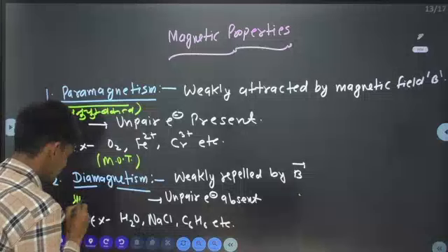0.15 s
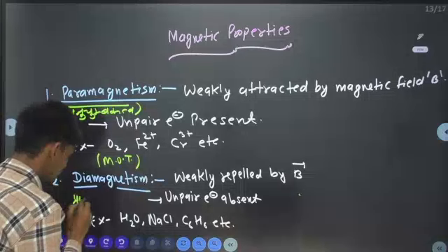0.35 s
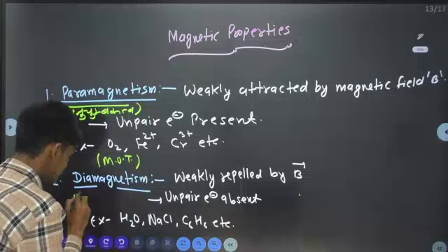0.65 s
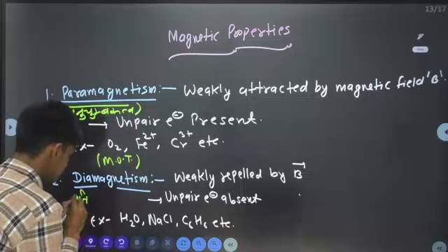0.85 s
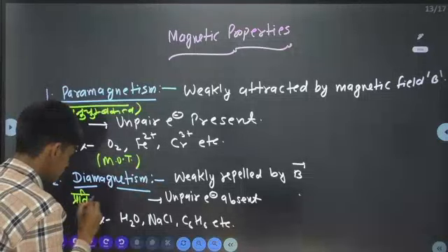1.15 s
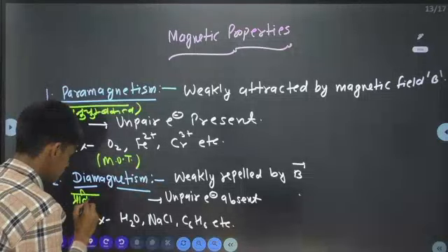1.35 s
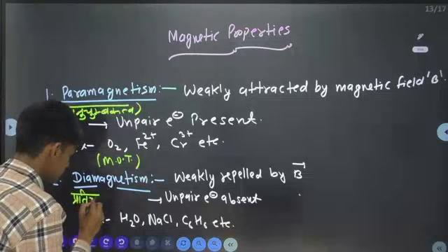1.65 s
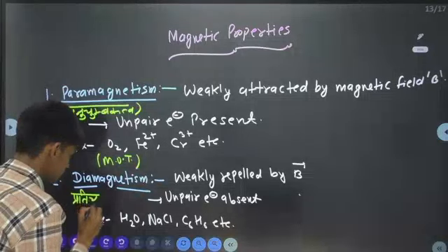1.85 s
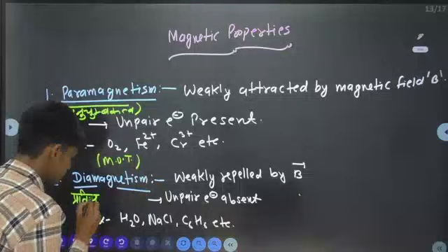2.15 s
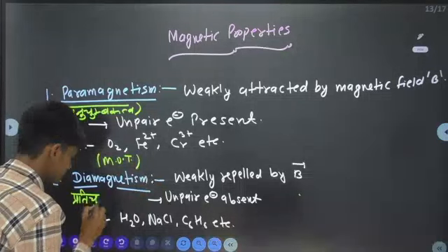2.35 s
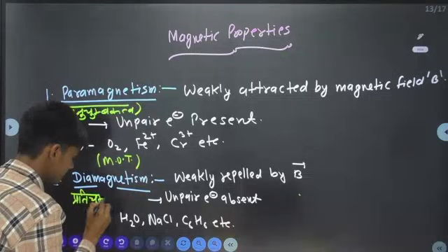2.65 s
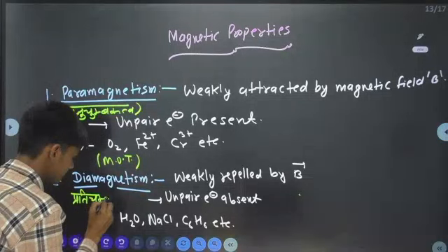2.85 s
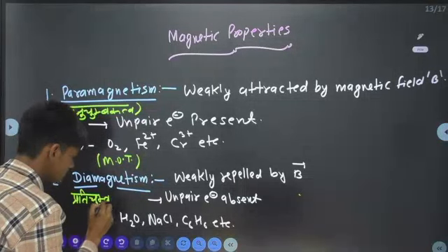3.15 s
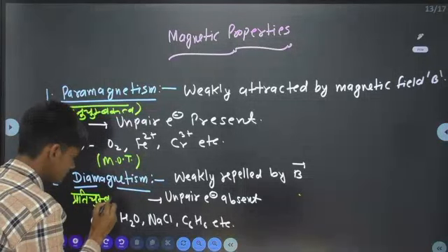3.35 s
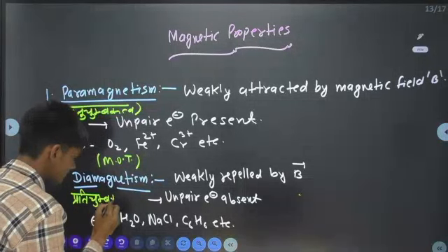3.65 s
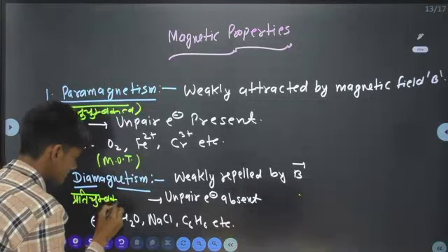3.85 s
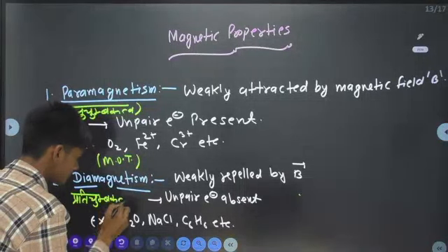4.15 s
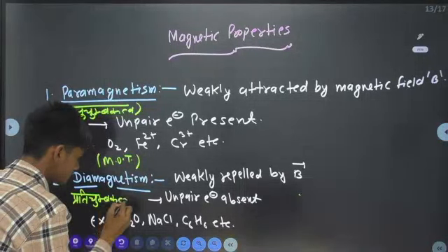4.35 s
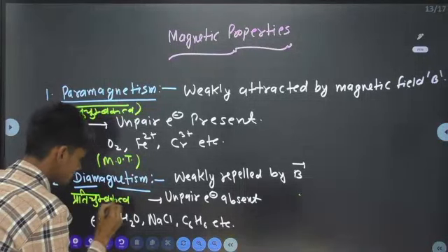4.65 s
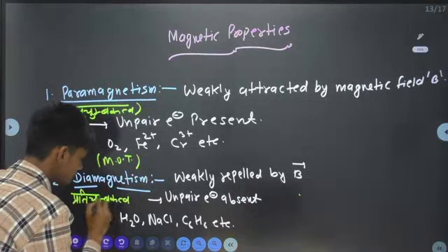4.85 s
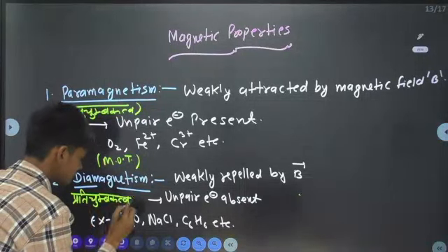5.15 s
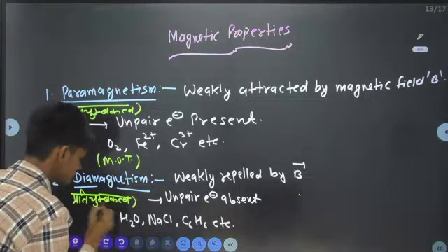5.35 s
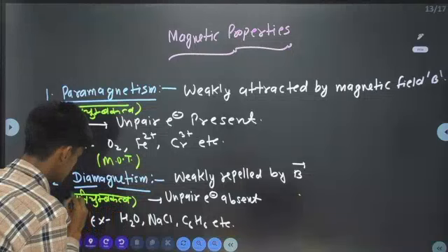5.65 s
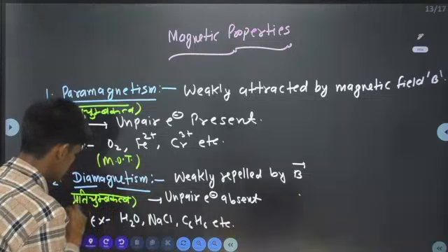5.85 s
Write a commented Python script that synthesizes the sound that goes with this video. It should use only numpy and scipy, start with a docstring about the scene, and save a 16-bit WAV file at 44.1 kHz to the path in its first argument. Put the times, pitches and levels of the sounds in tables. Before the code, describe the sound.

A hard pen taps irregularly and slides with a faint hiss on a large glass touchscreen in a quiet room.

```python
"""Someone writes with a hard pen on a large wall-mounted touchscreen in a quiet classroom.
From the start the room rumbles softly. Each landing of the pen knocks the glass, makes the pen tick
and leaves the panel and the room ringing; then friction makes the sliding tip hiss. Midway the pen
clicks in the fingers. Near the end a faint electrical whine sets in, a low hum swells and fades,
and the pen clicks a few more times before one last tap and stroke."""
import sys
import numpy as np
from scipy import signal
from scipy.fft import rfft, irfft, next_fast_len
from scipy.io import wavfile
from scipy.ndimage import map_coordinates

SR = 44100
rng = np.random.default_rng(int(sys.argv[2]) if len(sys.argv) > 2 else 0)


def file_out(sig):
    """Save sig as 16-bit WAV at sys.argv[1]."""
    # one column per channel
    cols = np.atleast_2d(sig).T
    # limit, then scale
    lim = np.clip(cols, -1, 1)
    pcm = np.round(lim * 32767).astype(np.int16)
    wavfile.write(sys.argv[1], SR, pcm)


N = 265658

# tone colour of the room's steady noise: f/Hz, relative level/dB
AIR_SPECTRUM = [(22, -12), (42, -1.5), (60, -17.5), (90, -10), (170, -15), (350, -13.5), (500, -25.5),
                (1000, -27), (1600, -32.5), (2600, -40.5), (6000, -45), (15500, -48.5)]
# how the rumble settles: t/s, relative level/dB
RUMBLE_CURVE = [(0, -46), (.7, -47.5), (1.5, -57), (2.1, -52.5), (5.2, -53.5), (6, -57)]
# the tip lands: t/s, knock level/dB, pen tick/dB and panel ring/dB (both relative to the knock),
# contact time/ms, lowest glass mode/Hz, share of the ring in the second mode (0 to 1)
LANDINGS = [ (-0.085, -5, -29.5, -37.5, 0.74, 694, 0.12), (0.2064, -7, -28.5, -36.5, 0.78, 480, 1),
            (0.4295, -7, -28, -36, 0.86, 705, 0.053), (0.7688, -10.5, -30, -39, 0.88, 688, 0.058),
            (1.1922, -13.5, -28.5, -35, .83, 720, 0.01), (2.0769, -9, -28, -33, .8, 660, 0.023),
            (2.4361, -13.5, -31.5, -35, 0.77, 532, 0.37), (2.942, -13, -31, -34, .77, 480, .67),
            (3.1546, -10, -29, -34.5, .83, 612, 0.12), (3.7842, -12.6, -31, -38.5, 0.772, 485, 0.34),
            (4.0189, -13.5, -32.5, -39, .81, 505, 0.17), (4.6733, -14.5, -30, -32, .83, 618, 0.023),
            (4.9754, -16.5, -29, -30.5, .94, 740, 0.78), (5.6032, -12.5, -24.5, -34.5, 1.08, 553, 0.79)]
# modes (natural tones) of the glass under the tip: f above the lowest/Hz, level relative to the knock/dB
GLASS_MODES = [(0, -12), (258, -12), (680, -23)]
# modes of the pen's body: f/Hz, width/Hz, relative level/dB
PEN_MODES = [(2104, 240, 3), (2870, 780, -2), (3620, 580, 0.5), (5570, 470, 2), (6300, 330, 5.5),
             (7150, 1160, 0), (10010, 1120, -5.5), (13000, 2000, -16)]
# long-ringing modes of the panel and its case: f/Hz, relative level/dB, time to fade by 60 dB/s
PANEL_MODES = [(119.4, -4, 0.39), (149.5, 3.5, 0.48), (163.8, 3, 0.47), (180, 0.5, 0.97),
               (237.9, 2.5, 0.43), (263.5, 3.5, 0.29), (315.3, 1.5, 0.52), (339.7, 1, 0.41),
               (349.4, -3.5, 0.87), (370.4, -3, 0.69), (378, -0.5, 0.55), (450, 7, 0.21), (685, -23, 0.33),
               (710, -4, 0.41), (776, -9, 0.21), (1230, -23, 0.18), (1614, -7.5, 0.23), (2010, -27, .2),
               (2340, -18, .18)]
# tone colour of the echoes in glass and room: f/Hz, relative level/dB
ECHO_SPECTRUM = [(60, 4), (150, 3), (330, 3.5), (520, -2), (750, -10.5), (1100, 3.5), (1500, -12.5),
                 (2000, -0.5), (3000, -2.5), (6000, -15), (10000, -12), (16000, -24)]
# how long those echoes last: f/Hz, time to fade by 60 dB/s
ECHO_FADE = [(60, 0.72), (300, 0.36), (600, 0.21), (1500, 0.28), (4000, 0.33), (12000, 0.42)]
# the tip slides: start/s, end/s, hiss level/dB, brightness (top resonances over low ones)/dB
SLIDES = [ (0, .047, -71, -7), (0.225, .284, -67.5, -1), (0.425, .562, -70.5, -3),
          (0.79, .922, -65.5, -1.5), (1.246, 1.32, -72, -4), (1.33, 1.389, -77, -10),
          (1.396, 1.546, -70, -6.5), (1.566, 1.688, -70.5, -2), (1.702, 1.76, -76, -3),
          (1.764, 1.896, -70, -3), (2.092, 2.176, -70.5, 3), (2.196, 2.329, -70, -4.5),
          (2.443, 2.557, -70, -6), (2.553, 2.719, -71.5, -1), (2.75, 2.798, -69, 5), (2.966, 2.996, -76, 2),
          (3.205, 3.272, -70.5, 8), (3.298, 3.415, -73, -1), (3.427, 3.62, -69.5, -0.5),
          (3.81, 3.903, -70, 3), (4.03, 4.248, -69.5, 2.5), (4.285, 4.344, -71, 2),
          (4.694, 4.824, -67.5, 1), (4.968, 5.076, -71.5, 2), (5.62, 5.706, -68, 5)]
# low, middle and top resonances of the sliding tip: f/Hz, width/Hz, relative level/dB
TIP_LOW_MODES = [(4000, 560, -13), (5560, 610, -3.5)]
TIP_MIDDLE_MODES = [(6740, 650, 3.7), (7700, 340, 0.5)]
TIP_TOP_MODES = [(10170, 520, -6.5), (10800, 500, -15.5), (14400, 1400, -18.5)]
# the pen shifts in the fingers: t/s, peak level/dB, f/Hz
FINGER_CLICKS = [(3.427, -44.5, 670), (5.397, -43.5, 8000), (5.4005, -52, 8000), (5.488, -45, 1270),
                 (5.4885, -53, 4400), (5.496, -51, 4370), (5.5075, -61, 4400)]


def from_db(db):
    """Turn decibels into a gain to multiply by."""
    return 10 ** (np.asarray(db) / 20)


def rms_one(x):
    """Scale a sound so that its average power is 1."""
    return x / np.sqrt(np.mean(x ** 2) + 1e-20)


def at_hz(points, hz):
    """Read between a table's rows, with octaves evenly spaced."""
    f, value = np.transpose(points)
    return np.interp(np.log(hz), np.log(f), value)


def add(out, s, sound):
    """Mix a sound in at s seconds, dropping what falls outside the scene."""
    at = int(round(s * SR))
    part = sound[max(-at, 0):N - at]
    out[max(at, 0):max(at, 0) + len(part)] += part


def cut(x, hz, kind):
    """Filter a sound, keeping the "high" side of hz or the "band" between two edges."""
    return signal.sosfilt(signal.butter(2, np.minimum(hz, SR / 2 - 1), kind, fs=SR, output="sos"), x)


def resonate(x, hz, width_hz):
    """Make a sound ring at one pitch; a smaller width rings longer."""
    r = np.exp(-np.pi * width_hz / SR)
    feedback = [1, -2 * r * np.cos(2 * np.pi * hz / SR), r * r]
    return signal.lfilter(np.array([1, 0, -1]) * (1 - r * r) / 2, feedback, x + 1e-18)


def drift(per_s):
    """A curve that wanders to a new random value per_s times a second."""
    values = rng.standard_normal(400)
    return np.interp(np.arange(N) / SR * per_s, np.arange(len(values)), values)


def room_noise(air_db=-56):
    """A low rumble that settles and steady room air, both shaped from noise."""
    rumble_db = np.interp(np.arange(N) / SR, *np.transpose(RUMBLE_CURVE)) - 2
    rumble = rms_one(cut(rng.standard_normal(N), [35, 56], "band"))
    size = next_fast_len(N)
    hz = np.maximum(np.fft.rfftfreq(size, 1 / SR), 1)
    spectrum = rfft(rng.standard_normal(size)) * from_db(at_hz(AIR_SPECTRUM, hz))
    air = cut(rms_one(irfft(spectrum, size)[:N]), 31, "high")
    return from_db(rumble_db) * rumble + from_db(air_db) * air


def narrow_hiss(hz=15100, width_hz=700, level_db=-85):
    """A faint, narrow hiss near 15 kHz."""
    return from_db(level_db) * rms_one(resonate(rng.standard_normal(N), hz, width_hz))


def glass_modes(lowest_hz, second_share, contact_ms, usual_ms=0.78, softening_db_per_ms=59):
    """The landing spot tunes three glass modes and balances two; short, hard contacts feed the third."""
    share = np.clip(second_share, .01, .99)
    above_hz, db = np.transpose(GLASS_MODES)
    third_db = softening_db_per_ms * (usual_ms - contact_ms)
    drive_db = [10 * np.log10(1 - share), 10 * np.log10(share), third_db]
    return np.transpose([lowest_hz + above_hz, db + drive_db])


def glass_knock(t, contact_ms, rebound_ms, modes, rebound_db=-11):
    """A brief push rings the glass under the tip; the bending wave comes back from the frame."""
    def push(start_ms):
        return np.sin(np.pi * np.clip((1000 * t - start_ms) / contact_ms, 0, 1)) ** 2
    first = push(0)
    pushes = first + from_db(rebound_db) * push(rebound_ms)
    wave = from_db(-2) * cut(pushes, 105, "high")  # the panel gives off little bass
    for hz, db in modes:
        ring = resonate(first, hz, width_hz=60)
        wave += from_db(db) * ring / np.abs(ring).max()
    return -wave


def pen_tick(t, rebound_ms, knock_db, chatter_s=0.003, chatter_db=-23, barrel_hz=4600, usual_db=-11):
    """The hard tip snaps against the glass, chatters, and is jolted again by the returning wave."""
    force = from_db(chatter_db) * rng.standard_normal(len(t)) * np.exp(-t / chatter_s)
    force[0] += 1  # the snap
    add(force, rebound_ms / 1000, from_db([-12]))  # the second jolt
    # harder landings bend the whole barrel, bringing out its lower modes
    barrel_db = 0.38 * (knock_db - usual_db)
    tick = np.zeros(len(t))
    for k, (hz, width, db) in enumerate(PEN_MODES):
        gain = from_db(db + barrel_db * (hz < barrel_hz))
        tick += (-1) ** k * gain * resonate(force, hz, width)
    return tick / np.sqrt(np.mean(tick[t < .005] ** 2))


def panel_ring(t, build_s=0.0016, spread_db=2.93):
    """The panel rings on; each landing spot drives its modes in a different mix, picked at random."""
    hz, db, fade_s = np.transpose(PANEL_MODES)[:, :, None]
    strength = from_db(db + rng.normal(0, spread_db, hz.shape))
    tones = np.sin(2 * np.pi * (hz * t + rng.random(hz.shape)))
    modes = strength * tones * from_db(-60 * t / fade_s)
    return modes.sum(axis=0) * (1 - np.exp(-t / build_s))


def echo_tails(t, count, gap_s=.003, build_s=0.00061, hold_s=0.0057, first_per_s=900, thicken_s=.018):
    """One echo tail per landing spot: reflections thicken, hold briefly, then die away band by band."""
    late = np.maximum(t - gap_s, 0)
    # echoes come one by one at first, then crowd together
    density = np.minimum(first_per_s * (1 + (late / thicken_s) ** 2) / SR, 1)
    shape = (2, count, len(t))  # two sets, so that neighbouring bands get different echoes
    echoes = rng.choice([-1, 1], shape) * (rng.random(shape) < density) / np.sqrt(density)
    edges_hz = 50 * 2 ** (np.arange(18) / 2)
    rise = 1 - np.exp(-late / build_s)
    out = 0
    for k, (low, high) in enumerate(zip(edges_hz, edges_hz[1:])):
        hz = np.sqrt(low * high)
        envelope = rise * from_db(-60 * np.maximum(late - hold_s, 0) / at_hz(ECHO_FADE, hz))
        band = cut(echoes[k % 2], [low, high], "band")
        out = out + from_db(at_hz(ECHO_SPECTRUM, hz)) * envelope / np.linalg.norm(envelope) * band
    return out


def taps(echo_db=-3):
    """Each landing makes a knock, a tick, echoes and a panel ring, all scaled by its strength."""
    out, t = np.zeros(N), np.arange(SR * 3 // 4) / SR
    brief = t[:SR // 10]
    for landing, tail in zip(LANDINGS, echo_tails(t, len(LANDINGS))):
        s, knock_db, tick_db, panel_db, contact_ms, lowest_hz, second_share = landing
        rebound_ms = 3.45 * contact_ms  # a longer, softer contact sends out a slower bending wave
        modes = glass_modes(lowest_hz, second_share, contact_ms)
        knock = glass_knock(brief, contact_ms, rebound_ms, modes)
        tick = from_db(tick_db) * pen_tick(brief, rebound_ms, knock_db)
        direct = from_db(knock_db) * (knock + tick)
        add(out, s, direct)
        add(out, s, from_db(echo_db) * signal.fftconvolve(direct, tail))
        add(out, s, from_db(knock_db + panel_db) * panel_ring(t))
    return out


def tip_friction(modes, turns_per_s=22, bend=0.032, grain_db=3, waver_db=2.2):
    """Fine grains of friction ring the tip; its resonances waver and bend as the pen leans into curves."""
    grains = rng.standard_normal(N) * from_db(grain_db * rng.standard_normal(N))
    hiss = np.zeros(N)
    for hz, width, db in modes:
        gain = from_db(db + waver_db * np.clip(drift(turns_per_s), -1.5, 1.5))
        hiss += gain * resonate(resonate(grains, hz, 2 * width), hz, 2 * width)
    position = np.cumsum(1 + bend * drift(turns_per_s))  # reading faster or slower bends the pitch
    return rms_one(map_coordinates(hiss, [position], mode="mirror"))


def strokes(fade_s=0.0077, swell_db=6, fastest_share=0.54, usual_hiss_db=-73.5):
    """The hiss swells as the tip gathers speed, peaks near mid-stroke and sinks as the tip slows."""
    t, out = np.arange(N) / SR, np.zeros(N)
    pressure_db = 1.3 * drift(per_s=28)  # the hand never presses quite evenly
    low, middle, top = map(tip_friction, (TIP_LOW_MODES, TIP_MIDDLE_MODES, TIP_TOP_MODES))
    for start, end, db, bright_db in SLIDES:
        near = slice(int(max(start - fade_s, 0) * SR), int((end + fade_s) * SR))
        contact = np.clip(np.minimum(t[near] - start, end - t[near]) / fade_s + .5, 0, 1)
        progress = (t[near] - start) / (end - start)
        speed = np.sin(np.pi * np.interp(progress, [0, fastest_share, 1], [0, .5, 1]))
        hiss_db = db + swell_db * (speed - 1) + pressure_db[near]
        # a strong slide favours the middle resonances over the low ones
        climb_db = 0.18 * (hiss_db - usual_hiss_db)
        hiss = (from_db(0.6 - bright_db / 2 - climb_db / 2) * low[near]
                + from_db(-0.3 + climb_db) * middle[near]
                + from_db(1 + bright_db / 2) * top[near])
        out[near] += contact * from_db(hiss_db) * hiss
    return out


def finger_clicks(decay_s=0.00096, relative_width=0.88, tail_db=-24, tail_s=0.034):
    """Tiny dry clicks as the pen shifts in the fingers."""
    out, t = np.zeros(N), np.arange(SR // 10) / SR
    envelope = np.exp(-t / decay_s) + from_db(tail_db) * np.exp(-t / tail_s)
    for s, db, hz in FINGER_CLICKS:
        burst = rng.standard_normal(len(t)) * envelope
        click = resonate(resonate(burst, hz, relative_width * hz), hz, relative_width * hz)
        add(out, s, from_db(db) * click / np.abs(click).max())
    return out


def electrical_whine(hz=6002, start_s=4.83, level_db=-85):
    """A thin, high tone switches on and stays."""
    t = np.arange(N) / SR
    return from_db(level_db) * np.sqrt(2) * np.sin(2 * np.pi * hz * t) * (t > start_s)


def hum(hz=193.8, start_s=5.15, end_s=5.6, top_db=-54, rise_s=0.077, stop_s=0.074, fade_db_per_s=28):
    """A low pure tone swells, fades slowly and stops."""
    t = np.arange(N) / SR
    gate = np.clip(np.minimum((t - start_s) / rise_s, (end_s - t) / stop_s), 0, 1)
    level_db = top_db - fade_db_per_s * np.maximum(t - start_s - rise_s, 0)
    return gate * from_db(level_db) * np.sqrt(2) * np.sin(2 * np.pi * hz * t)


def scene():
    """Writing on the screen, heard from close by, in one channel."""
    writing = taps() + strokes() + finger_clicks()
    return (writing + room_noise() + narrow_hiss() + electrical_whine() + hum())[None]


def record(dry, cutoff_hz=16000):
    """A steep filter removes the very highest treble."""
    return signal.sosfilt(signal.ellip(10, .1, 80, cutoff_hz, fs=SR, output="sos"), dry)


dry = scene()
out = record(dry)
file_out(out)
```